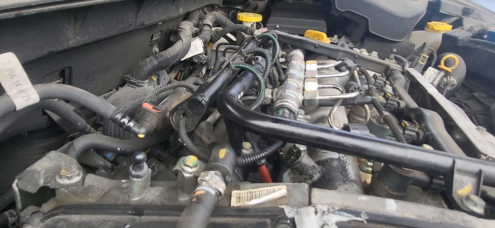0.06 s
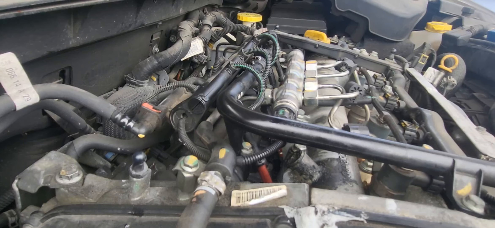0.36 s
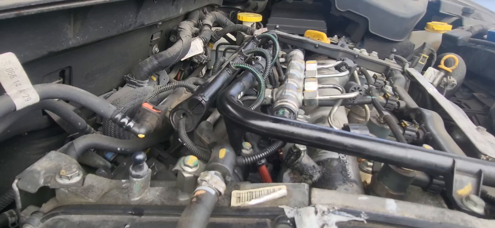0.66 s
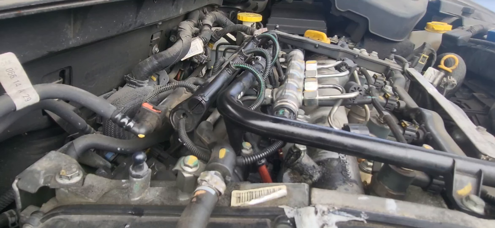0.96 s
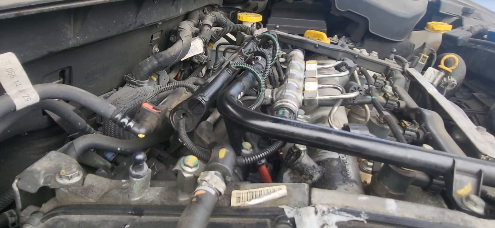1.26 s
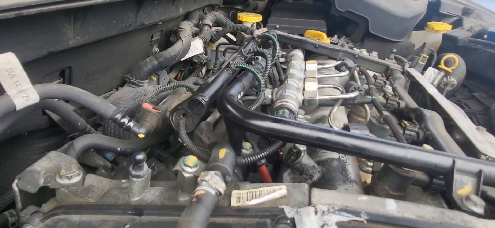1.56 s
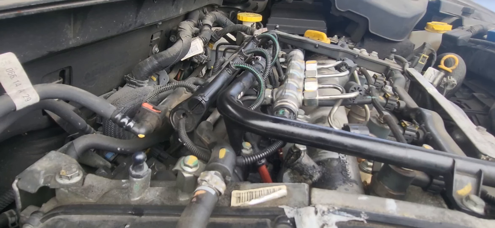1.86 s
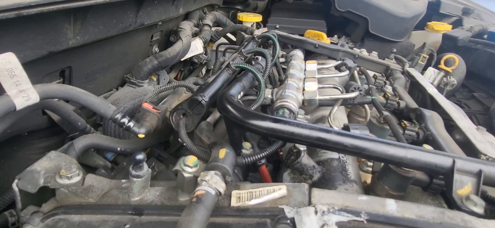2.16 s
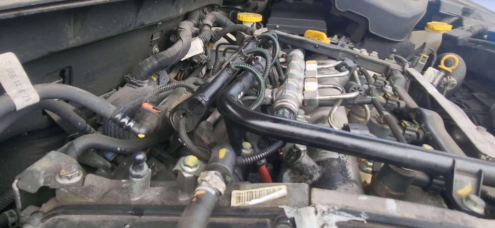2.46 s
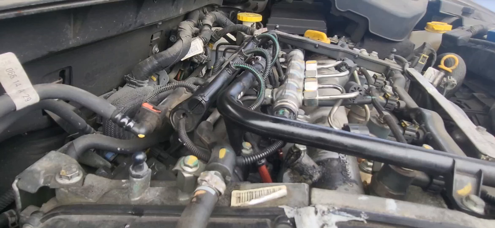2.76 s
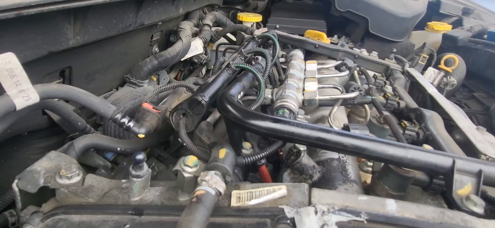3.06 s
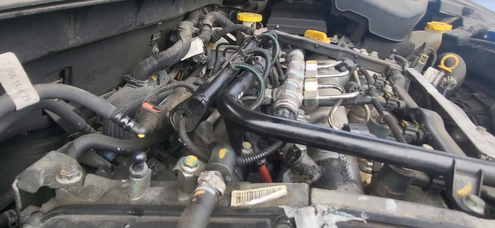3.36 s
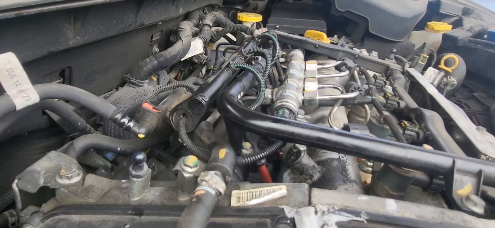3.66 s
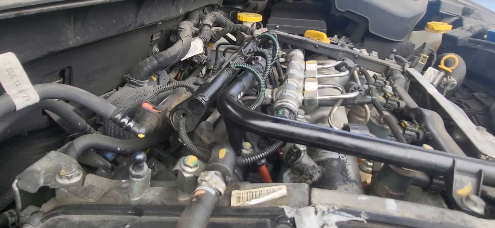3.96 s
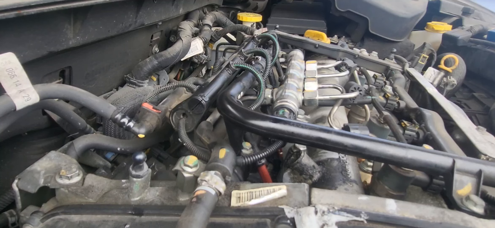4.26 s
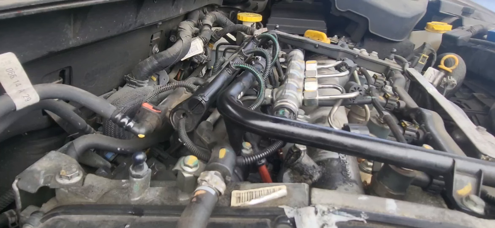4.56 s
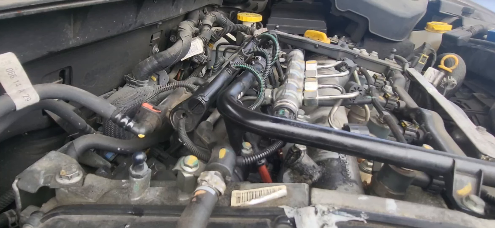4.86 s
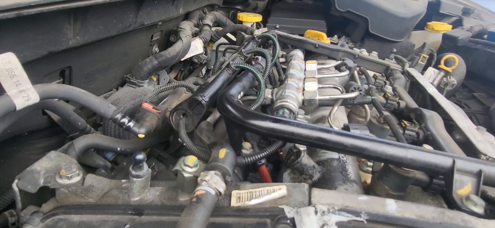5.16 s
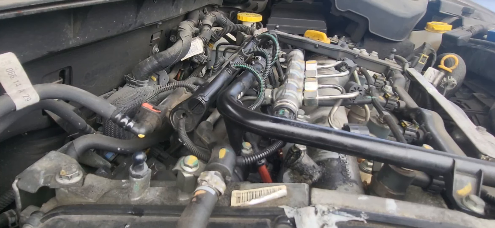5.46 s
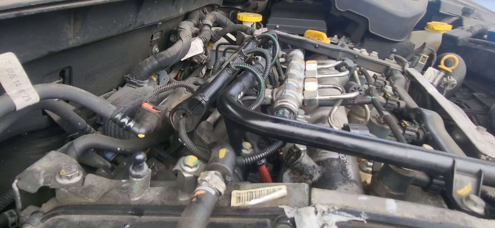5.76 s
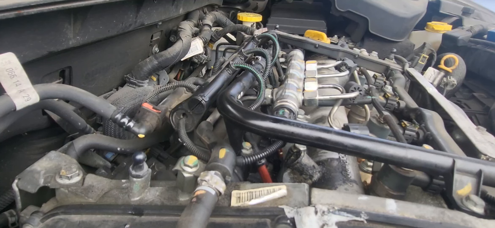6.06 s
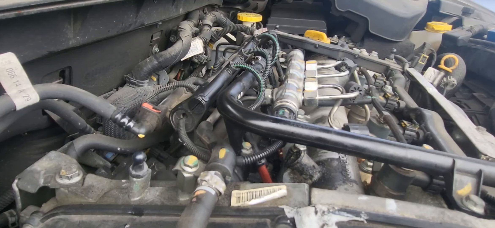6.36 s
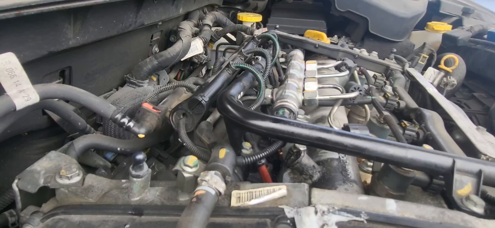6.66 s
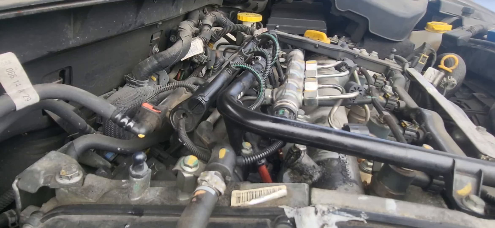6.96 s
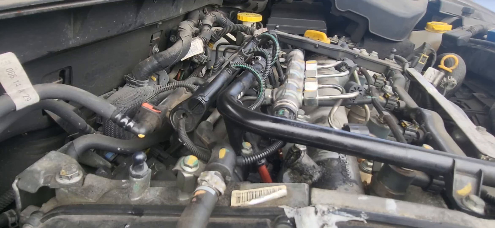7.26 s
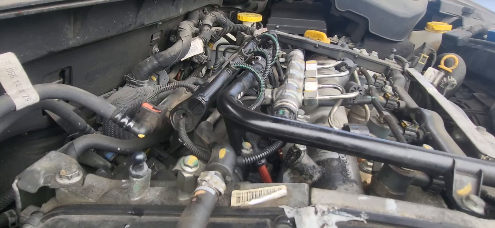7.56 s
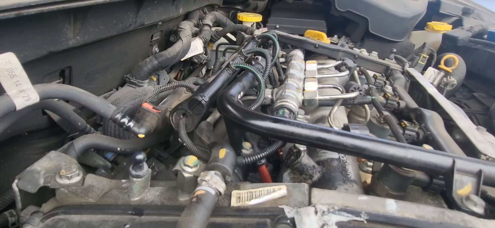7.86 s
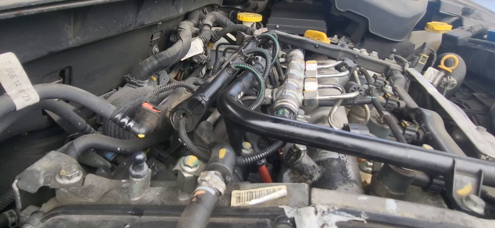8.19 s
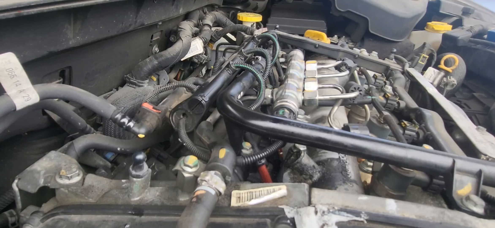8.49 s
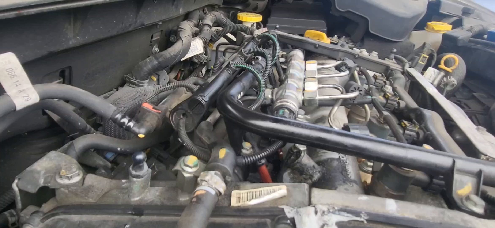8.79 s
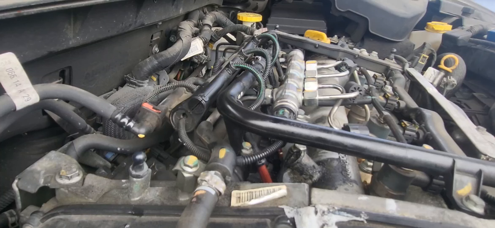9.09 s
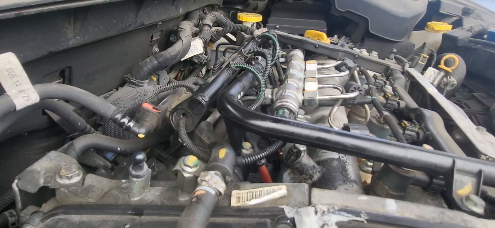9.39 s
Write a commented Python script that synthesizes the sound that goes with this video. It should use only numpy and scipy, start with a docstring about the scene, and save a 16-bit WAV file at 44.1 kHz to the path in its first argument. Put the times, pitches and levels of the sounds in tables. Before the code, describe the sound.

A vehicle drones past from left to right while hard parts knock and rattle close by in an engine bay.

```python
"""Drive-by at a roadside workshop

Heard beside an open bonnet. A motor vehicle passes left to right: its exhaust drone swells, drops in
pitch and fades unevenly, amid tyre roar, body boom and stirred air. Close on the right, handled hard
parts knock and rattle through their resonances, a small steel piece pings, and there is one short hiss.
Engine bay and walls reflect the handling. A far bird chirps; more traffic nears at the end."""
import sys
import numpy as np
from scipy import signal
from scipy.fft import rfft, irfft, next_fast_len
from scipy.io import wavfile
from scipy.ndimage import map_coordinates

SR = 44100
rng = np.random.default_rng(int(sys.argv[2]) if len(sys.argv) > 2 else 0)


def file_out(sig):
    """Save sig as 16-bit WAV at sys.argv[1]."""
    # one column per channel
    cols = np.atleast_2d(sig).T
    # limit, then scale
    lim = np.clip(cols, -1, 1)
    pcm = np.round(lim * 32767).astype(np.int16)
    wavfile.write(sys.argv[1], SR, pcm)


N = 420446
TIME = np.arange(N) / SR
PASS_S = 4.12  # vehicle abreast


def from_db(db):
    """Decibels to gain."""
    return 10 ** (np.asarray(db) / 20)


def rms_one(x):
    """Scale to rms 1."""
    return x / np.sqrt(np.mean(x ** 2) + 1e-20)


def curve(rows):
    """Interpolate (seconds, value) rows at every sample."""
    return np.interp(TIME, *np.transpose(rows))


def drift(rate_hz):
    """Smooth random wander, rms 1."""
    hop = 40
    r = np.exp(-2 * np.pi * rate_hz * hop / SR)
    slow = signal.lfilter([1], [1, -2 * r, r * r], rng.standard_normal(N // hop + 2002))[2000:]
    return np.interp(np.arange(N) / hop, np.arange(len(slow)), rms_one(slow))


def noise(spectrum, channels):
    """Independent noises, rms 1, coloured by (Hz, dB) rows."""
    size = next_fast_len(N)
    hz, db = np.transpose(spectrum)
    gain = from_db(np.interp(np.log(np.fft.rfftfreq(size, 1 / SR) + 1), np.log(hz), db))
    return rms_one(irfft(rfft(rng.standard_normal((channels, size))) * gain, size)[:, :N])


def band(x, edges_hz, kind, order=2):
    """Butterworth filter."""
    sos = signal.butter(order, edges_hz, kind, fs=SR, output="sos")
    return signal.sosfilt(sos, x + 1e-18)


def shelf(x, edge_hz, lift_db):
    """Raise or lower everything above an edge."""
    dull = signal.sosfiltfilt(signal.butter(4, edge_hz, fs=SR, output="sos"), x)
    return dull + (x - dull) * from_db(lift_db)


def resonate(x, hz, width_hz):
    """Resonance with peak gain 1."""
    r, w = np.exp(-np.pi * width_hz / SR), 2 * np.pi * hz / SR
    zeros = np.array([1, 0, -1]) * (1 - r * r) / 2
    return signal.lfilter(zeros, [1, -2 * r * np.cos(w), r * r], x + 1e-18)


def ring(clicks, hz, t60_s):
    """A unit click starts a decaying sine of height 1."""
    r, w = np.exp(-np.log(1000) / (t60_s * SR)), 2 * np.pi * hz / SR
    return signal.lfilter([0, np.sin(w)], [1, -2 * r * np.cos(w), r * r], clicks + 1e-18)


def clicks_at(times_s, db):
    """One impulse per event."""
    out = np.zeros(N)
    np.add.at(out, np.round(times_s * SR).astype(int), from_db(db))
    return out


def from_side(x, lag_ms):
    """Stereo pair; left lags right by a varying delay."""
    shift, at = lag_ms * SR / 2000, np.arange(N)
    return np.array([map_coordinates(x, [at + sign * shift], order=3) for sign in (-1, 1)])


def on_the_right(x, lag_ms=0.48):
    """A close source reaches the left side late, shadowed in two bands."""
    left = x - 0.5 * resonate(x, 1360, 900) - 0.67 * resonate(x, 11100, 7900)
    return np.array([np.roll(left, round(lag_ms * SR / 1000)), x])


def still_air(level_db=-85.5):
    """Faint steady noise floor."""
    # Each row: frequency in Hz, relative density in dB.
    spectrum = [(200, 9), (2000, -15), (4000, -6), (7000, -4.5), (8700, 10), (11000, 0.5), (16000, -18.5)]
    return from_db(level_db) * noise(spectrum, channels=2)


def bird(centre_hz=4600, fall_hz_per_s=9000, half_width_s=0.064):
    """Short falling chirps, blurred by distance."""
    # Each row: centre in seconds, relative level in dB.
    chirps = [(.25, -74.5), (6.901, -72), (7.44, -79), (7.91, -75.5)]
    out = np.zeros((2, N))
    blur = 6 * band(rng.standard_normal((2, N)), 450, "low")
    for centre_s, db in chirps:
        t = TIME - centre_s
        sweep = np.sin(2 * np.pi * (centre_hz - fall_hz_per_s * t / 2) * t)
        out += from_db(db) * np.exp(-(t / half_width_s) ** 2) * sweep * blur
    return out


def engine_bay(x, delay_s=0.003, blur_hz=60, blur_rad=2.24):
    """The jumbled bay returns a blurred copy, different on each side."""
    blur = np.sqrt(2) * np.cos([blur_rad * drift(blur_hz) for side in range(2)])
    return np.roll(x, round(delay_s * SR), axis=1) * blur


def reflections(x, t60_s, cutoff_hz):
    """Diffuse tail from bay and walls, different on each side."""
    t = TIME[:SR // 2]
    tail = rng.standard_normal((2, len(t))) * np.exp(-np.log(1000) * t / t60_s) * (t > 0.002)
    tail = band(tail / np.sqrt(np.sum(tail[0] ** 2)), cutoff_hz, "low", order=1)
    return signal.fftconvolve(x, tail, axes=1)[:, :N]


def short_hiss(start_s=6.157, rise_s=0.025, decay_s=0.21, gain_db=-50, scatter_db=-3):
    """A bright hiss on the right starts fast and dies away, partly scattered."""
    # Each row: frequency in Hz, relative density in dB.
    spectrum = [(1200, -2.5), (2300, -1.5), (2800, 0.5), (3400, -5), (4150, 1), (5200, -7), (6500, -13),
                (8200, -5.5), (11000, -11), (14500, -12), (16000, -22)]
    t = np.maximum(TIME - start_s, 0)
    envelope = from_db(gain_db) * np.minimum(t / rise_s, 1) * np.exp(-(t / decay_s) ** 2)
    direct, *scattered = noise(spectrum, channels=3)
    return envelope * (on_the_right(direct) + from_db(scatter_db) * np.array(scattered))


def bumps(gain_db=4.5):
    """A heavy part is set down with a dull thud."""
    # Each row: time in seconds, relative level in dB, left minus right in dB.
    impacts = [(0.386, -38, -1), (0.513, -36.5, -2), (0.673, -29.5, 2), (1.144, -27.5, 3),
               (5.834, -37, 0.0), (6.503, -29, -19.5), (6.583, -37.5, -22), (6.617, -35.5, -18),
               (6.664, -34, 4), (8.297, -39, 3.0), (9.407, -38, -2)]
    times_s, db, pan_db = np.transpose(impacts)
    hits = [clicks_at(times_s - 0.002, db + gain_db + sign * pan_db / 2) for sign in (1, -1)]
    push = band(np.array(hits), 550, "low")
    return ring(push, 138, t60_s=0.1) - 1.08 * ring(push, 237, t60_s=0.011)


def pings(gain_db=2.0, pan_db=-3.5, t60_s=0.1, chatter_s=0.016, hard_touch_db=-39):
    """Steel rings in a beating pair and an overtone; its chatter adds a tick and rough lower notes."""
    # Each row: time in seconds, relative ring level in dB, relative chatter level in dB.
    touches = [(5.0642, -37, -54), (5.2603, -53, -56), (5.308, -43, -61), (5.4097, -56, -58),
               (6.6968, -53, -60), (6.7227, -53, -67), (6.8446, -52, -56), (7.1523, -57, -62),
               (8.0855, -58, -65), (8.886, -65, -82), (9.0932, -47.5, -64), (9.144, -52, -71),
               (9.4104, -56, -50)]
    times_s, db, chatter_db = np.transpose(touches)
    overtone_db = -1.5 + 0.5 * (db - hard_touch_db)  # harder is brighter

    def chatter(levels_db):
        decay = np.exp(-1 / (chatter_s * SR))
        envelope = signal.lfilter([1], [1, -decay], clicks_at(times_s, levels_db) + 1e-18)
        return envelope * rng.standard_normal(N)

    sides = []
    for side_db in (gain_db + pan_db / 2, gain_db - pan_db / 2):
        hits = clicks_at(times_s, db + side_db)
        pair = 0.98 * ring(hits, 8865, t60_s) + 0.06 * ring(hits, 8925, t60_s)
        overtone = ring(clicks_at(times_s, db + side_db + overtone_db), 14320, t60_s=0.046)
        rough = from_db(17.5) * resonate(chatter(chatter_db + side_db), 4540, 130)
        tick = from_db(-10) * band(chatter(db + side_db), 3260, "high")
        bite = from_db(-1) * resonate(chatter(db + side_db), 5870, 520)
        sides.append(pair + overtone + rough + tick + bite)
    return np.array(sides)


def contacts(ticks_per_s=9, spread_db=3, tick_crack_db=-4.5, tick_t60_s=0.18):
    """Knocks of handled parts, plus faint random ticks of fumbling."""
    # Each row: time in seconds, relative body, shell and crack levels in dB, nominal t60 in seconds.
    hits = [(0.082, -63, -64.5, -54, 0.28), (0.379, -48, -62, -71, 0.33), (0.440, -63, -69, -66, 0.099),
            (0.514, -40, -67, -84, 0.031), (0.628, -57, -55, -56.5, 0.46), (0.668, -40.5, -39, -43, 0.12),
            (0.723, -68, -44, -71, 0.049), (0.764, -68, -39.5, -50, 0.1), (0.797, -33.5, -32, -31, 0.078),
            (0.805, -47, -27, -27, 0.074), (0.860, -64, -42, -48, 0.031), (0.961, -39.5, -40, -57, 0.094),
            (1.072, -38, -32, -27.5, 0.066), (1.108, -39, -35, -41.5, 0.26), (1.133, -48, -32, -36, 0.046),
            (1.142, -29, -28.5, -34.5, 0.049), (1.315, -47.5, -50, -56, 0.15),
            (1.341, -52, -51, -55, 0.036), (1.506, -39.5, -76, -74, 0.025), (1.667, -47, -32.5, -35.5, .13),
            (1.716, -45, -36, -39.5, 0.025), (1.801, -43, -40, -63, 0.062), (1.819, -41, -37.5, -45, 0.23),
            (1.949, -71, -49, -52.5, .2), (2.022, -54, -37.5, -41.5, 0.2), (2.131, -46, -43.5, -51, 0.026),
            (2.186, -44.5, -56, -57.5, .075), (2.243, -42, -55, -70, 0.03), (2.297, -59, -43.5, -51, 0.13),
            (2.453, -44, -49, -54, 0.042), (2.543, -53, -49, -50.5, 0.29), (2.610, -39, -46.5, -50, 0.033),
            (3.219, -50, -42.5, -40, 0.065), (3.260, -51, -27, -40, 0.058), (3.274, -29, -28.5, -39, 0.035),
            (3.481, -53, -49, -50, 0.047), (3.567, -59, -41, -54, 0.11), (5.495, -56, -47.5, -57, 0.23),
            (5.758, -50, -44, -48.5, .16), (5.774, -37, -45, -58, 0.19), (5.823, -41.5, -51, -53, 0.15),
            (5.840, -37, -41, -45.5, 0.052), (6.047, -37, -44, -58, 0.085), (6.664, -34, -42, -58, .18),
            (6.845, -57, -50, -48, 0.081), (8.121, -46, -51.5, -61, 0.086), (8.274, -39, -49, -70, 0.048),
            (8.294, -33.5, -38, -49.5, 0.055), (8.397, -45, -65, -74, 0.079), (8.421, -52, -53.5, -64, .17),
            (8.479, -43.5, -50.5, -50.5, 0.067), (8.568, -64, -62, -84, 0.096),
            (8.661, -47.5, -51, -57, 0.066), (8.881, -55.5, -62.5, -71, 0.32), (9.090, -49, -54, -53, 0.14),
            (9.408, -32.5, -43, -48.5, 0.058)]
    # Each row: start in seconds, end in seconds, mean relative tick level in dB.
    fumbling = [(1.206, 1.5, -63), (1.8, 2.9, -58), (8.246, 8.9, -71.5)]
    rows = list(hits)
    for start_s, end_s, db in fumbling:
        for slot_s in np.arange(start_s, end_s, 1 / ticks_per_s):
            late, size = rng.standard_normal(2)
            tick_s, tick_db = slot_s + 0.5 * late / ticks_per_s, db + spread_db * size
            rows.append((tick_s, tick_db, tick_db, tick_db + tick_crack_db, tick_t60_s))
    return np.array(rows)


def rattle(times_s, levels_db, t60s_s, grain_db=4.0, rise_s=0.00028, scrape_db=-22.5, scrape_s=0.015):
    """Each knock: a short scrape, then a dying burst of tiny uneven contacts."""
    power = np.zeros(N)
    for hit_s, db, t60_s in zip(times_s, levels_db, t60s_s):
        onset = int(hit_s * SR)
        span = slice(max(onset - SR // 10, 0), onset + SR // 3)
        t = TIME[span] - hit_s
        after = np.maximum(t, 0)
        burst = (1 - np.exp(-after / rise_s)) * np.exp(-np.log(1000) * after / t60_s)
        scrape = from_db(scrape_db) * np.exp(-np.abs(t) / scrape_s)
        power[span] += (from_db(db) * (burst + scrape)) ** 2
    grains = rms_one(rng.standard_normal(N) * from_db(grain_db * drift(580)))
    return np.sqrt(power) * grains


def part(drive, low_hz, high_hz, direct_db, vary_db=1.6):
    """Contacts drive one range of the parts' modes, in proportions that vary from knock to knock."""
    # Each row: frequency in Hz, bandwidth in Hz, relative gain in dB.
    part_modes = [(289, 230, -4.5), (505, 80, 4), (671, 200, -12.5), (992, 444, -8.5), (1514, 315, 7),
                  (1770, 190, 9), (2055, 105, 2), (2620, 100, 5.5), (3350, 360, -7), (4500, 240, -18),
                  (5180, 430, -2), (7820, 200, 5), (8400, 420, -5), (9260, 250, 7), (14000, 300, -24.5)]
    modes = [(hz, width_hz, (-1) ** k * from_db(db))
             for k, (hz, width_hz, db) in enumerate(part_modes) if low_hz < hz < high_hz]

    def respond(x, strength):
        rings = sum(gain * resonate(x * strength(), hz, width_hz) for hz, width_hz, gain in modes)
        return band(rings + from_db(direct_db) * x, [low_hz * 0.95, high_hz * 1.046], "band")

    noise_gain = np.linalg.norm(respond(signal.unit_impulse(SR // 10), lambda: 1))
    return respond(drive, lambda: from_db(vary_db * drift(11))) / noise_gain


def knocks():
    """Dull thud, hollow body note, shell clack and bright crack; later, softer contacts thud more."""
    # Each row: time in seconds, gain of the crack's top in dB (lower is softer).
    softness = [(1.9, -0.5), (3.2, -8.5), (5.7, -4.5)]
    times_s, body_db, shell_db, crack_db, t60_s = contacts().T
    top_db = curve(softness)
    hardness_db = np.interp(times_s, TIME, top_db)
    thud_db, hollow_db = body_db - 0.6 * hardness_db, body_db + 3.5 + 0.38 * hardness_db
    thud = part(rattle(times_s, thud_db, 1.04 * t60_s), 180, 680, direct_db=-4)
    hollow = part(rattle(times_s, hollow_db, 0.89 * t60_s), 540, 963, direct_db=1.5)
    clack = part(rattle(times_s, shell_db - 2, 1.115 * t60_s), 1273, 4070, direct_db=-4.5)
    crack = part(rattle(times_s, crack_db - 2, 0.89 * t60_s), 4100, 17000, direct_db=-4.5)
    return thud + hollow + clack + shelf(crack, 11300, top_db)


def rumble(buffet_gain_db=2.0, boom_gain_db=8.5, gust_db=1.3, side_db=-14):
    """Stirred air buffets the microphone in gusts; the vehicle's body booms."""
    # Each row: frequency in Hz, relative density in dB.
    buffet_spectrum = [(10, -4), (22, 7.5), (45, 9), (62, 12.5), (90, -7), (200, -56)]
    boom_spectrum = [(40, -17), (70, -1), (105, 4.5), (140, -2.5), (200, -7.5), (280, -16.5), (420, -32),
                     (900, -72)]
    # Each row: time in seconds, relative level in dB.
    buffet_levels = [(0, -55), (.65, -45.5), (1.0, -55), (1.12, -37), (1.5, -47.5), (2.4, -42), (3.2, -50),
                     (4.0, -34.5), (4.35, -36), (5.1, -51), (6.5, -44.5), (7.4, -48), (8.6, -54.5),
                     (9.53, -53)]
    boom_levels = [(0.0, -55), (0.4, -55.5), (0.66, -51), (3.32, -43.5), (4.14, -36.5), (4.48, -46.5),
                   (5.2, -52.5), (5.47, -47), (6.29, -52), (6.5, -49), (7.72, -61.5), (9.53, -57.5)]
    buffet_db = curve(buffet_levels) + buffet_gain_db + gust_db * drift(4.5)
    buffet = from_db(buffet_db) * noise(buffet_spectrum, channels=2)
    boom_db = curve(boom_levels) + boom_gain_db + 1.1 * drift(17)
    mid, side = buffet + from_db(boom_db) * noise(boom_spectrum, channels=2)
    return mid + from_db(side_db) * side * [[1], [-1]]


def nearness(peak_s=4.2, approach_s=0.4, recede_s=0.48, next_end_db=-13.5, next_db_per_s=24):
    """Roar gain: 1 / distance on a straight road, plus more traffic nearing at the end."""
    along = (TIME - peak_s) / np.where(TIME < peak_s, approach_s, recede_s)
    next_traffic = from_db(next_end_db + next_db_per_s * (TIME - TIME[-1]))
    return np.hypot(1 / np.hypot(1, along), next_traffic)


def tyres(bearing, gain_db=-41.5, diffuse_db=3, far_treble_db=-10, reach_s=2.66, tread_gain_db=-10):
    """Road roar crosses left to right, brightest when near; the tread sings behind the vehicle."""
    # Each row: frequency in Hz, relative density in dB.
    spectrum = [(100, -13.5), (250, 3), (400, 0.5), (600, -1), (800, -2), (1000, -2.5), (1300, -7.5),
                (2100, -11), (3200, -16.5), (5300, -21), (7000, -28.5), (9000, -28), (11000, -33),
                (16000, -35.5)]
    # Each row: time in seconds, treble lift in dB.
    brightness = [(0, -5.5), (.4, 0.5), (.9, -3), (4, 2.5), (6.7, -1), (7.7, -9), (8.3, 0.5), (9.53, -1)]
    direct, shared, *scattered = noise(spectrum, channels=4)
    diffuse = band(np.array(scattered), 520, "high", order=1) + band(shared, 520, "low", order=1)
    roar = rms_one(from_side(direct, lag_ms=0.42 * bearing) + from_db(diffuse_db) * diffuse)
    far = 1 - 1 / (1 + ((TIME - PASS_S - 0.3) / reach_s) ** 2)
    roar = shelf(roar, 1300, curve(brightness) + 0.22 * drift(28))
    roar = shelf(roar, 2900, far_treble_db * far + 1.6 * drift(40))
    tread_hz = 1060 - 95 * bearing  # sinks on passing
    phase = 2 * np.pi * np.cumsum(tread_hz) / SR
    tread = np.array([drift(26) * np.sin(phase) + drift(24) * np.cos(phase) for side in range(2)])
    tread *= (1 + bearing) / 2 * from_db(tread_gain_db - 6.5 * far)
    return nearness() * from_db(gain_db + 0.25 * drift(26)) * (roar + tread)


def throb(first_trough_s=7.147, first_period_s=0.1133, growth_s_per_s=0.1264, depth=0.63):
    """Gain of the distant drone: a beat whose period grows steadily."""
    period_s = np.maximum(first_period_s + growth_s_per_s * (TIME - first_trough_s), first_period_s / 2)
    beats = np.log(period_s / first_period_s) / growth_s_per_s
    fade_in = np.clip(2 * beats + 1, 0, 1)
    return np.abs(1 - depth * fade_in * np.exp(2j * np.pi * beats))


def exhaust(bearing, gain_db=1.5, jitter_rad=0.071, churn_rad=1.0, churn_s=0.21, dip_db=-2):
    """Muffled firing pulses: nearly a sine, churned on passing, wavering and at last throbbing far off."""
    # Each row: time in seconds, firing rate as heard in Hz.
    firing_rates = [(0, 89.6), (.35, 98), (.6, 95.7), (.95, 101), (3.1, 100.9), (3.5, 98.7), (4.2, 92),
                    (4.45, 85), (4.9, 79.6), (5.5, 86.3), (5.78, 93), (6.35, 90), (7, 85.5), (8.05, 79),
                    (8.3, 72.9), (8.85, 67.8), (9.53, 80)]
    # Each row: time in seconds, relative level of the fundamental in dB.
    levels = [(0, -45), (.45, -38.5), (.77, -51.5), (1.0, -38.5), (2.28, -30), (2.6, -38), (3.03, -22.5),
              (3.8, -22.5), (4.22, -21.5), (4.62, -16.5), (4.86, -21.5), (5.1, -34), (5.55, -43.5),
              (5.66, -30.5), (5.94, -37.5), (6.5, -31), (6.67, -36.5), (7.02, -33), (7.3, -51.5),
              (7.82, -41), (8.1, -47), (8.3, -39.5), (8.85, -41.5), (9.53, -48.5)]
    # Each row: time in seconds, second harmonic in dB re the fundamental.
    buzz = [(0, -13.5), (1.7, -12.5), (2.75, -6.5), (3.1, -25), (3.55, -9.5), (4.6, -36), (5.2, -7.5),
            (5.8, -21), (9.53, -24)]
    abreast = np.exp(-((TIME - PASS_S) / churn_s) ** 2)
    far = np.minimum(np.abs(TIME - PASS_S) / 2, 1) ** 2
    phase = 2 * np.pi * np.cumsum(curve(firing_rates)) / SR
    phase += (jitter_rad + churn_rad * abreast) * drift(22)
    left_lead_rad = 0.14 - 0.074 * bearing
    phase = np.array([phase + left_lead_rad, phase - left_lead_rad])
    waver_db = 0.27 * drift(45) + 0.4 * far * drift(7.9)
    envelope = from_db(curve(levels) + gain_db + dip_db * abreast + waver_db) * throb()
    overtones = np.sin(2 * phase) + from_db(-20) * np.sin(3 * phase)
    return envelope * (np.sin(phase) + from_db(curve(buzz) + 1.9 * drift(6)) * overtones)


def scene(crossing_s=0.28):
    """Passing vehicle, close handling with reflections, hiss, bird and still air."""
    bearing = (TIME - PASS_S) / np.hypot(TIME - PASS_S, crossing_s)  # -1 far left, 1 far right
    vehicle = exhaust(bearing) + rumble() + tyres(bearing)
    knocking = from_db(-1) * on_the_right(knocks())
    handling = knocking + pings()
    echoes = from_db(-3.5) * engine_bay(knocking)
    echoes += from_db(-7.5) * reflections(handling, t60_s=0.033, cutoff_hz=13000)
    echoes += from_db(-12.5) * reflections(handling, t60_s=0.19, cutoff_hz=0.45 * SR)
    return vehicle + handling + echoes + short_hiss() + bumps() + bird() + still_air()


def record(dry):
    """Steep low-pass at 15.9 kHz."""
    return signal.sosfilt(signal.ellip(10, 0.1, 80, 15900, fs=SR, output="sos"), dry)


dry = scene()
out = record(dry)
file_out(out)
```